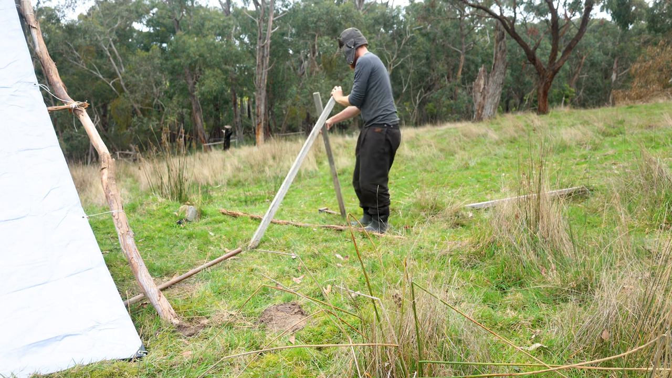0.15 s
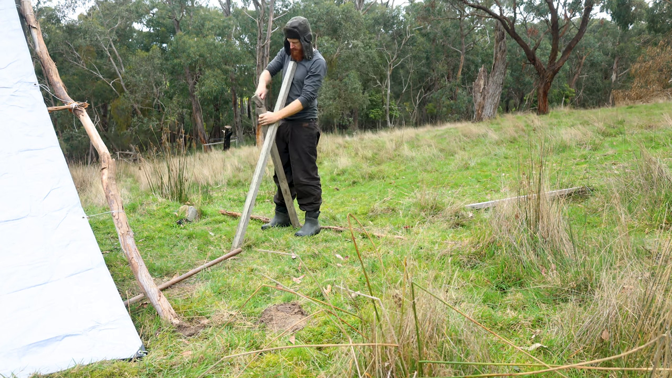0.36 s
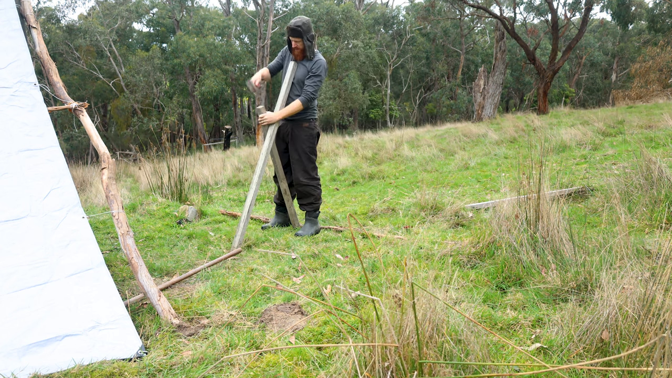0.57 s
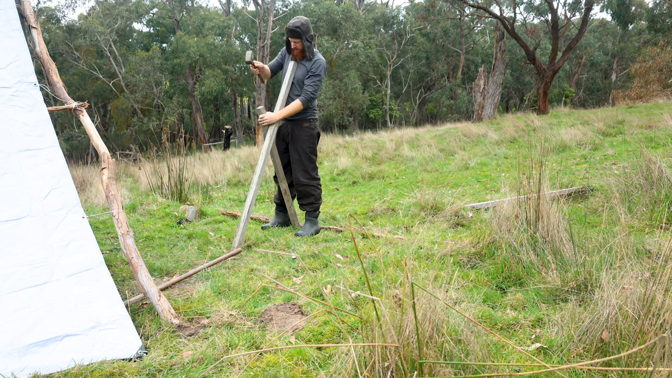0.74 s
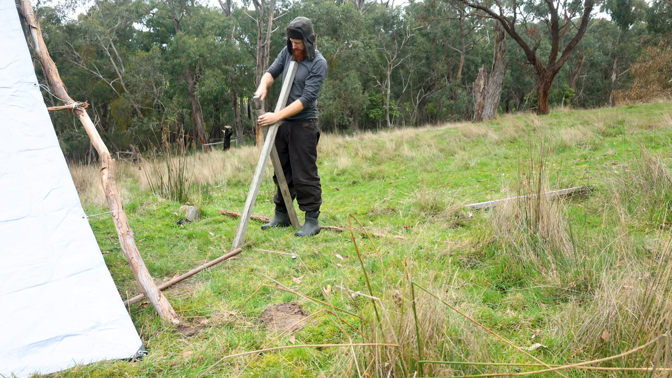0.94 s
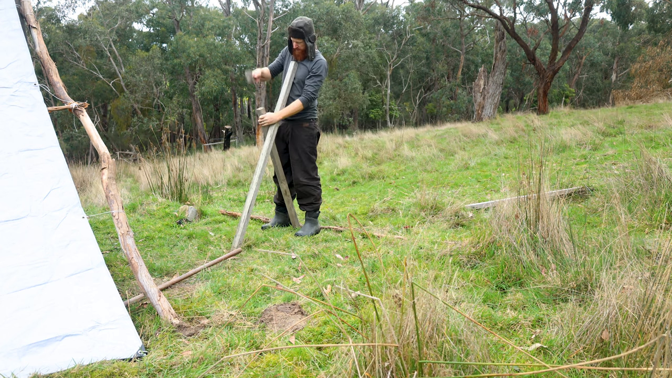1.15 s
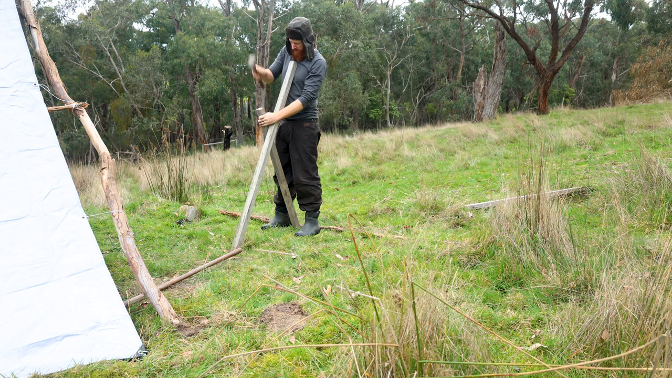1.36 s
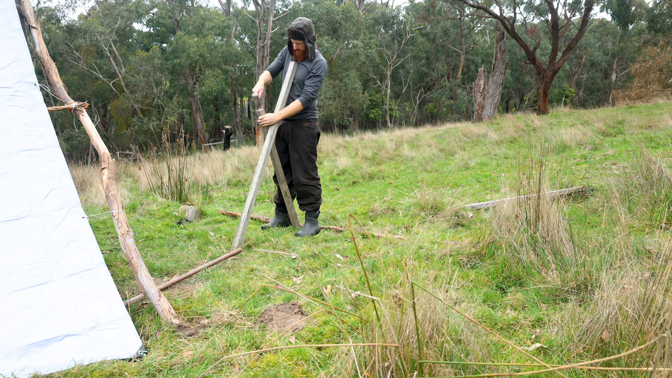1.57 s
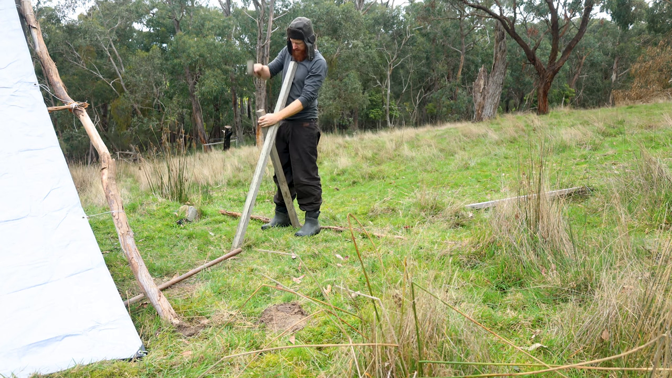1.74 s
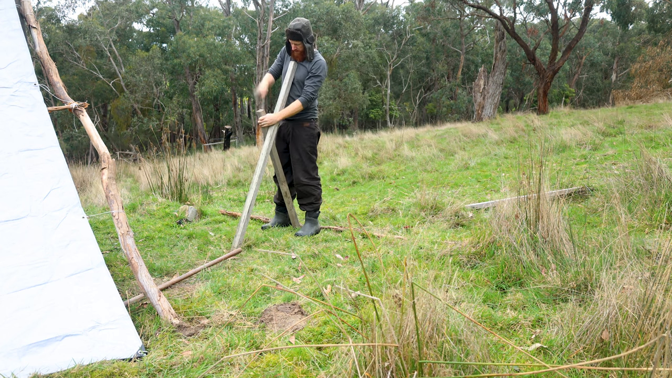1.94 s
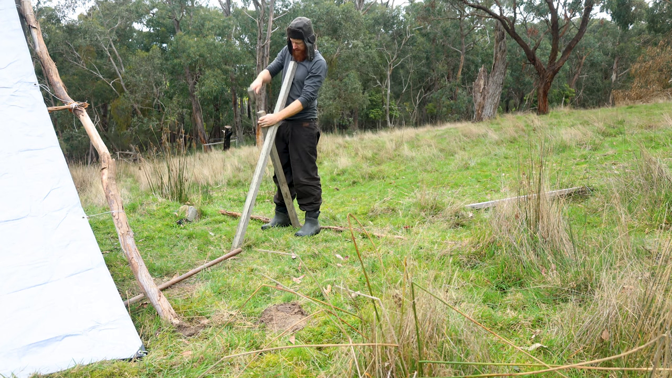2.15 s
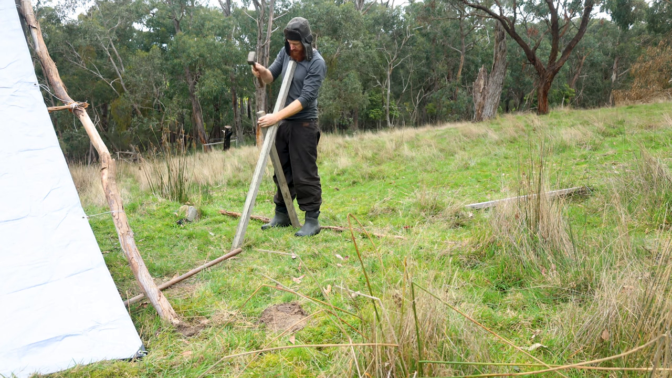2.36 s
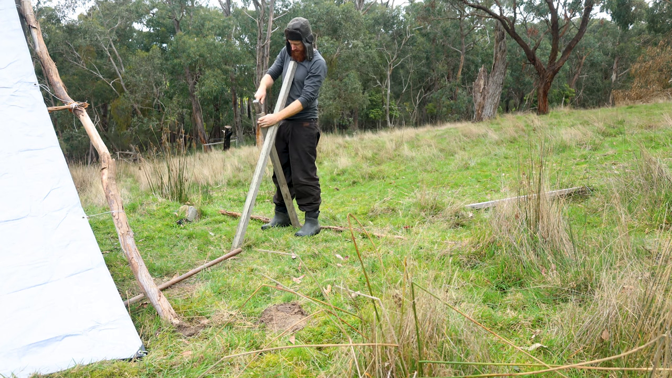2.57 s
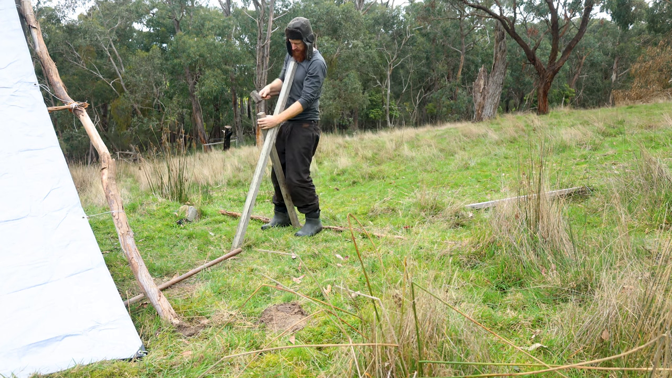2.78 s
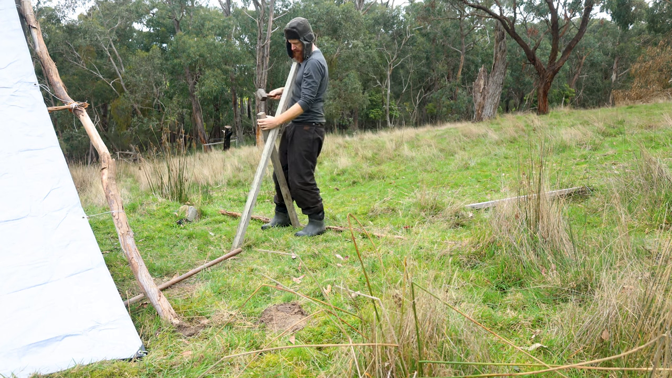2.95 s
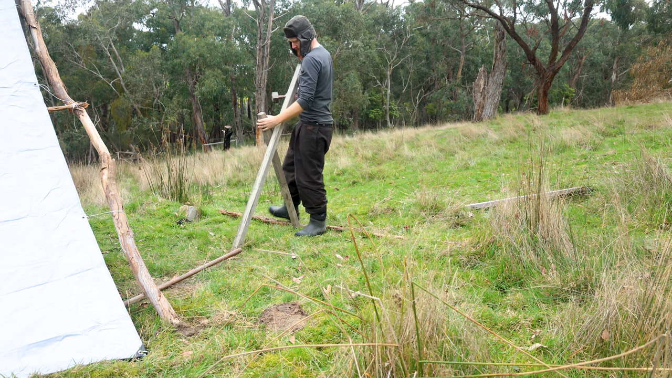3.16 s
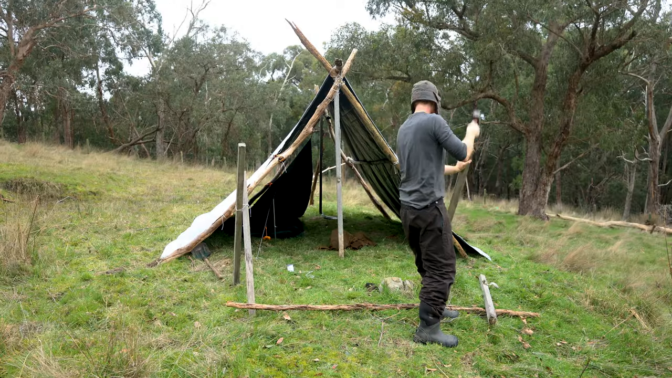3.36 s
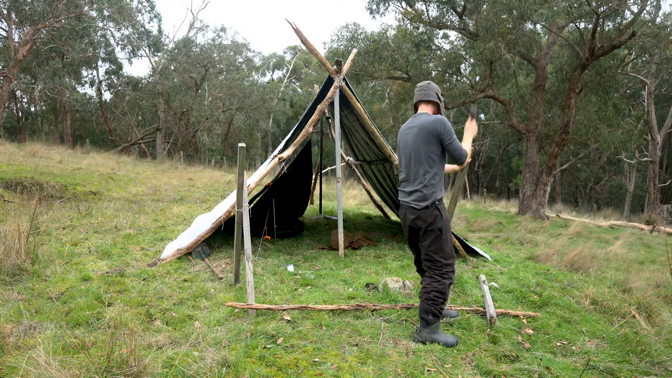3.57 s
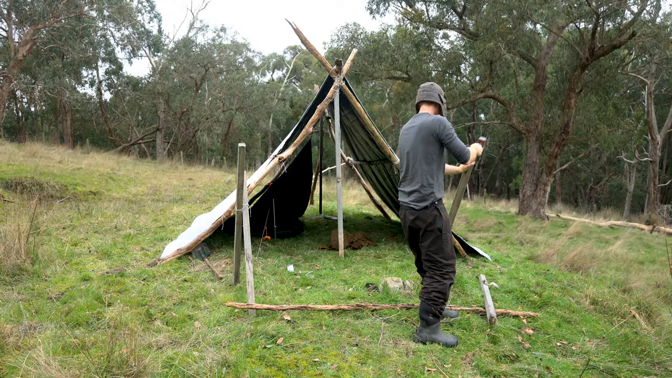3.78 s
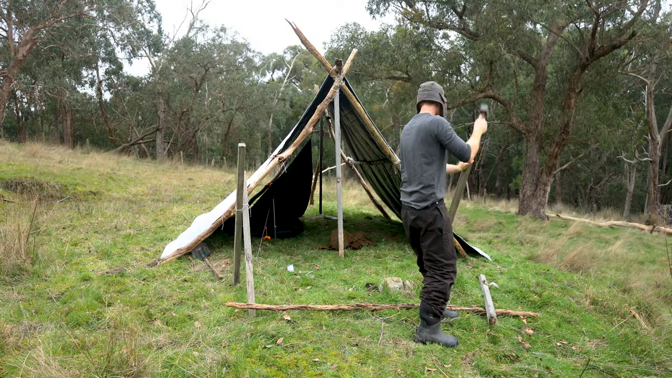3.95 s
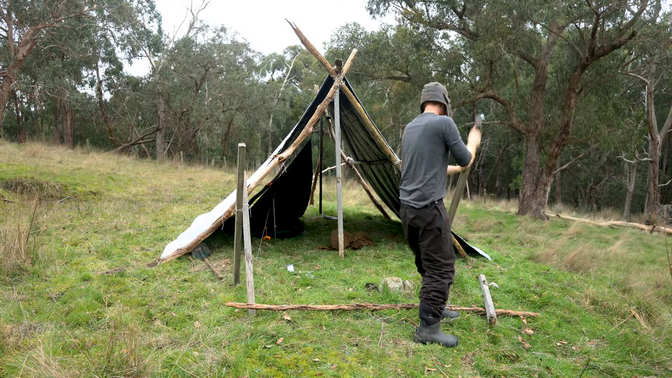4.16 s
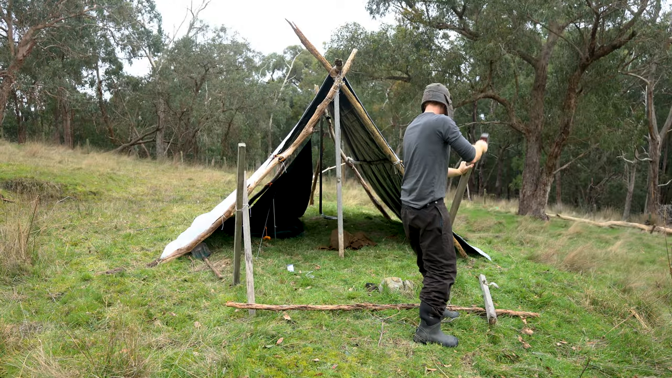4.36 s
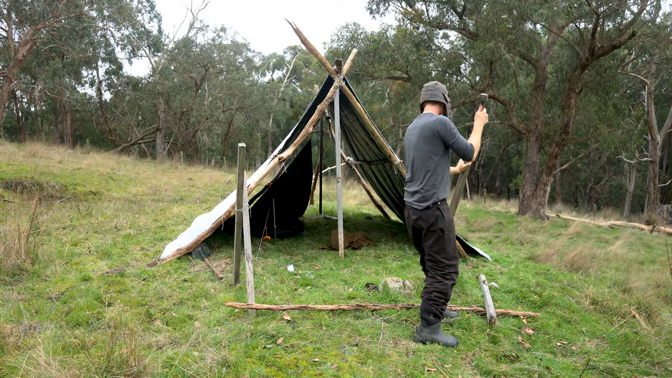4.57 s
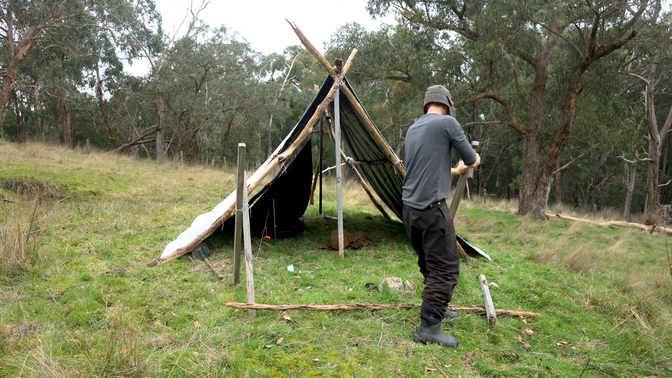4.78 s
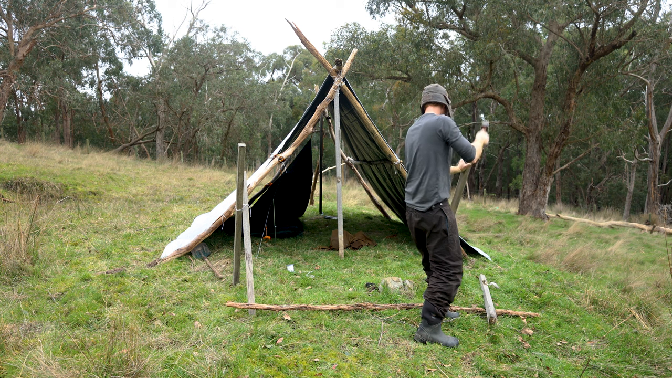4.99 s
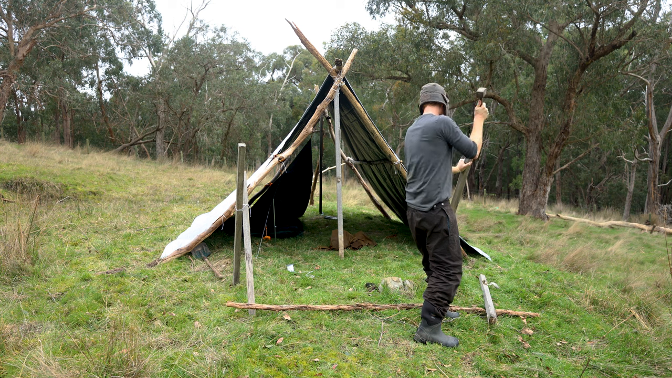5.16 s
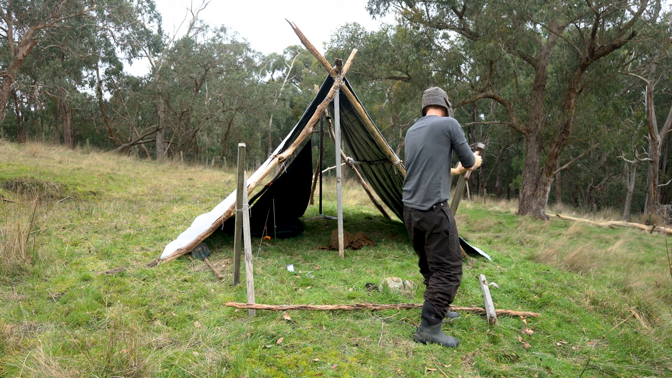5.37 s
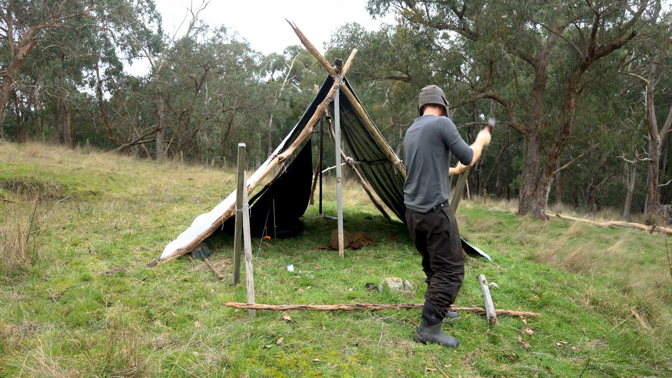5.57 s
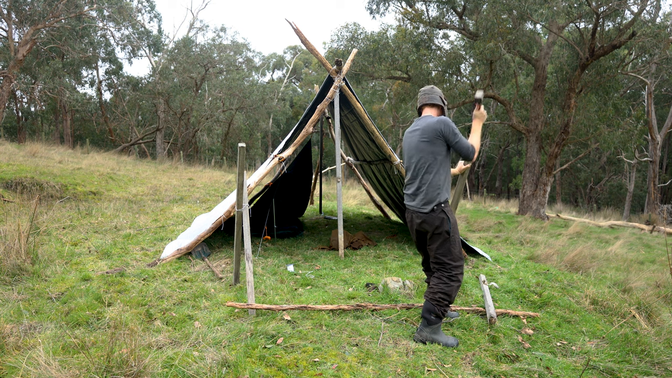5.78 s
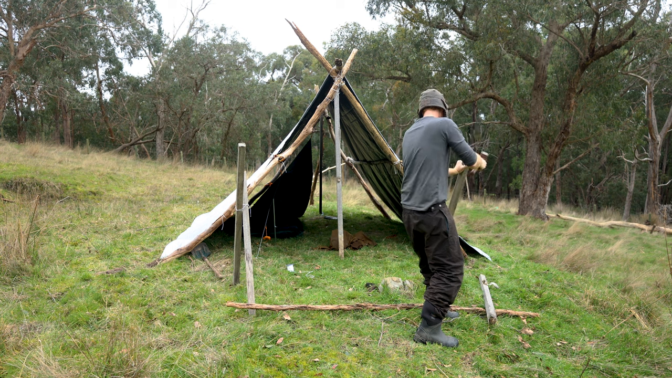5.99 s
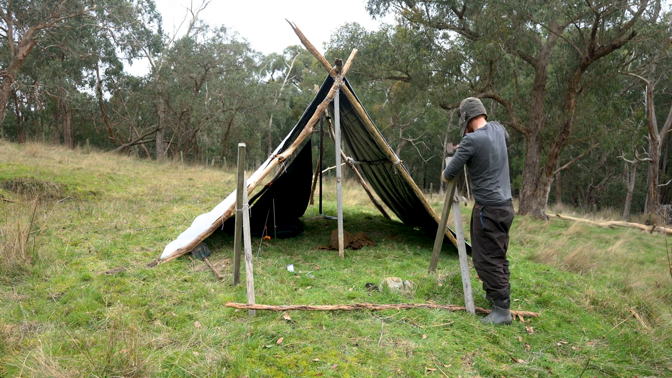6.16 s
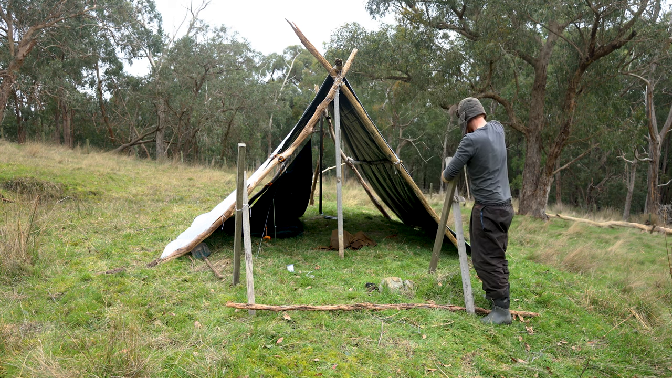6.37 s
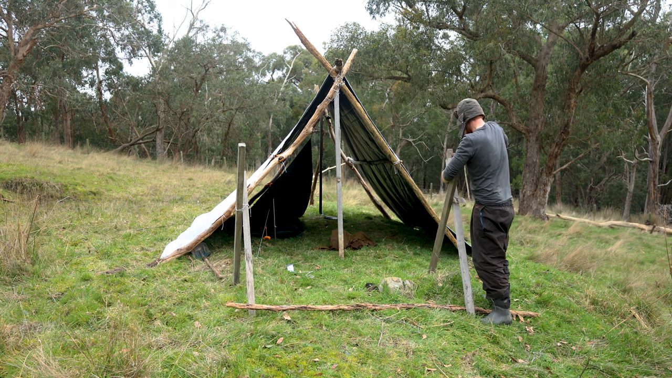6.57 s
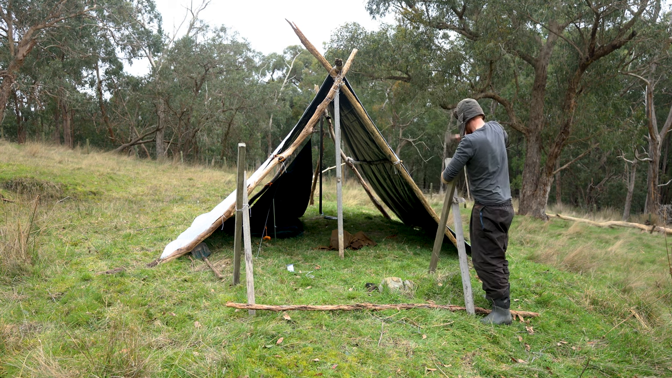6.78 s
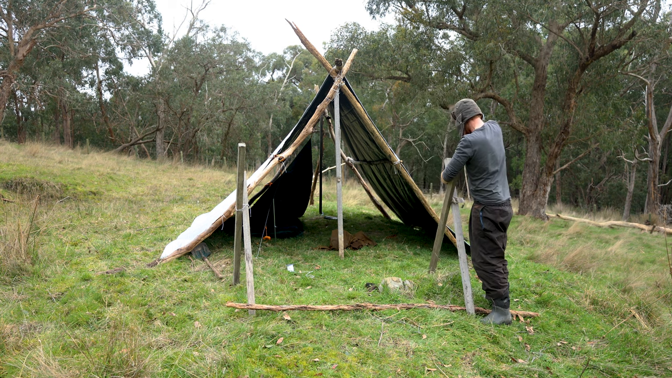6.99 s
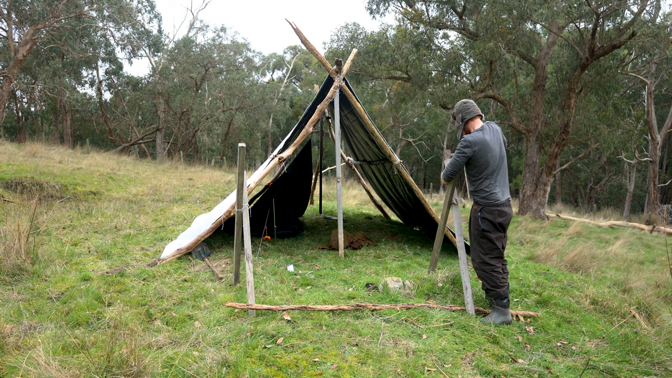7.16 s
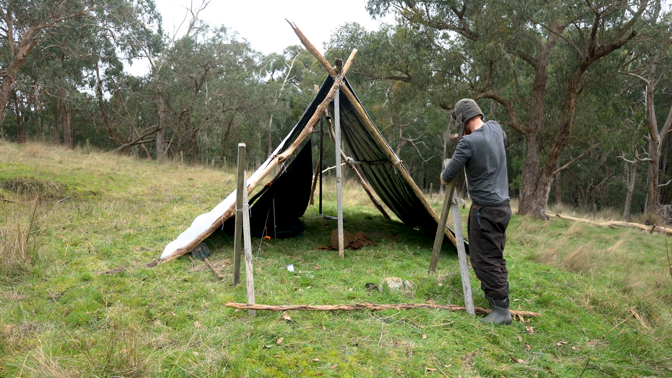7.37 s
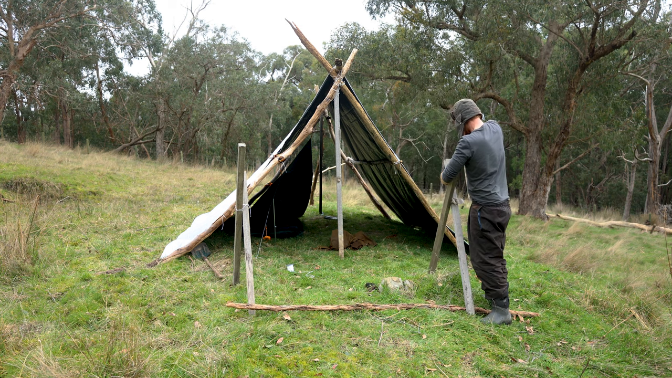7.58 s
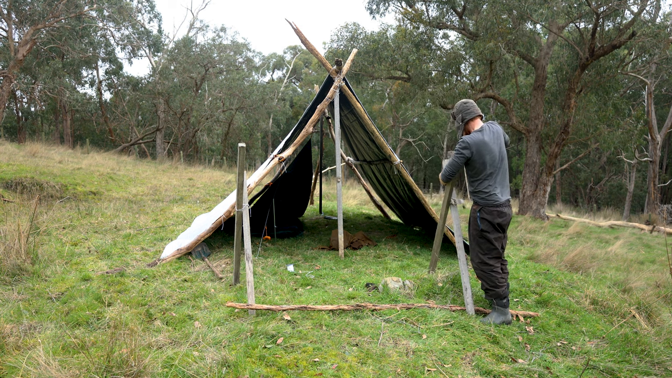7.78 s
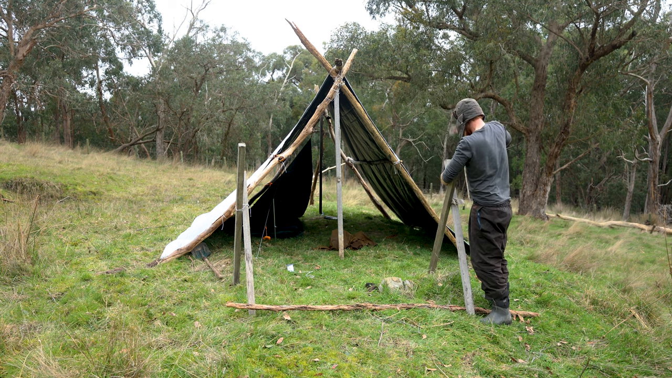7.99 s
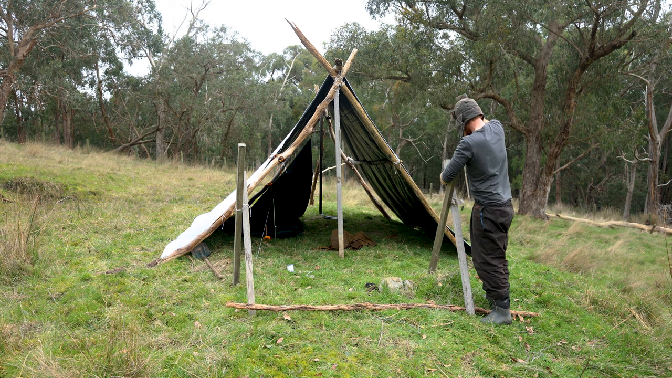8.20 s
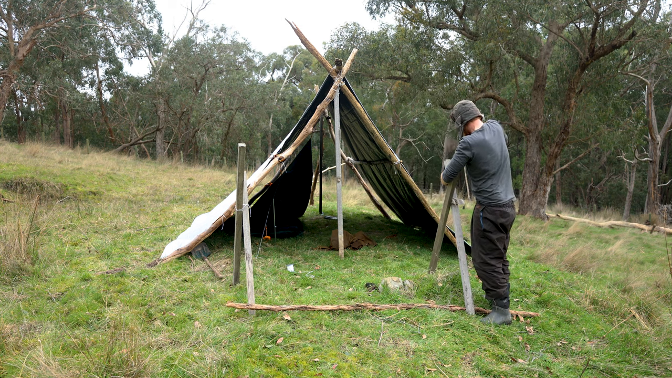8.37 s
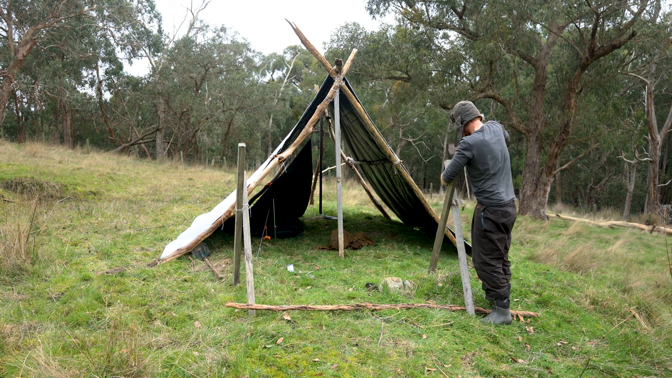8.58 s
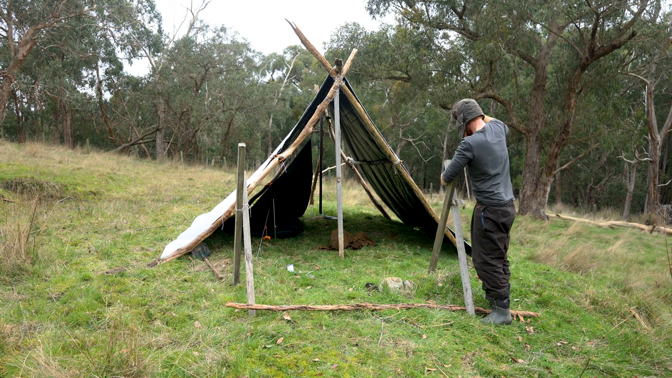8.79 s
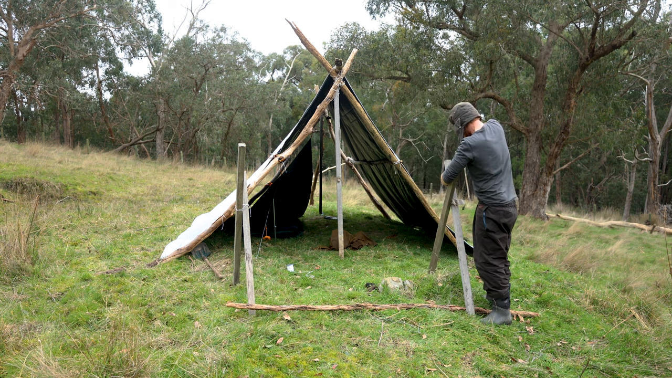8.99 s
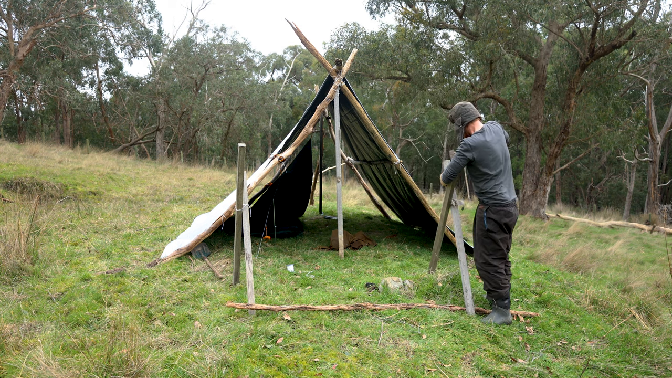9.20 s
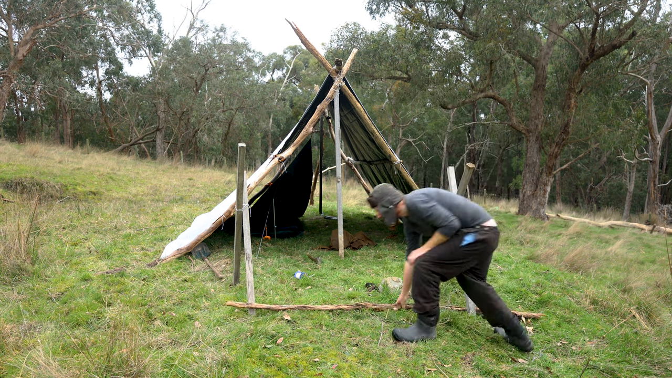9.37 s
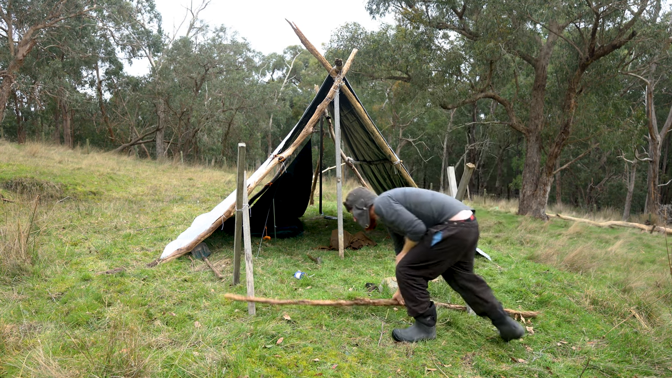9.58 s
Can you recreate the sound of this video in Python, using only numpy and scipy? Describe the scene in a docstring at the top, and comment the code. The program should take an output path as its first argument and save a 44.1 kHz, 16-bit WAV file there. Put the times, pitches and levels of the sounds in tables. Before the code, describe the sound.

Outdoor hammering on three stakes in turn, heard by a microphone a few metres off with low wind rumble. Dry, short, hard knocks are followed by distinct slaps and a long diffuse wash from the trees. The timbre jumps abruptly twice as the stake changes. Stalks rustle at the start and just before the first change; two thin bird chirps come early, with faint peeps and a low engine later. After the last blow, dry grass crackles underfoot.

```python
"""Three wooden stakes are hammered into turf in turn, in a clearing ringed by forest, with abrupt jumps between them.
Dry stalks snap and boots brush the grass at the start, before the first jump and after the last.
Each blow cracks, rings in the damped modes of the wood and returns as distinct echoes and a long wash from the trees.
A near bird calls twice early on; around the first jump a far engine and stronger wind come in, then a far bird peeps.
Treetops hush throughout as filtered noise; gain control ducks on loud knocks and creeps back, and peaks are flattened."""
import sys
import numpy as np
from scipy import signal
from scipy.fft import rfft, irfft, next_fast_len
from scipy.io import wavfile
from scipy.ndimage import uniform_filter1d

SR = 44100
rng = np.random.default_rng(int(sys.argv[2]) if len(sys.argv) > 2 else 0)


def store_wav(level_fs):
    """Save 16-bit WAV to argv[1]."""
    pcm = np.round(np.clip(np.atleast_2d(level_fs), -1, 1) * 32767)
    wavfile.write(sys.argv[1], SR, pcm.T.astype(np.int16))


N = 425124
TIME = np.arange(N) / SR
CUTOFF_HZ = 16300  # top of the audible range here

# Jumps between the spells of sound. Each entry: start of a spell in seconds.
JUMPS_S = (0, 3.385, 6.19, 9.314)


def from_db(db):
    """Decibels to gain."""
    return 10 ** (np.asarray(db) / 20)


def unit(x):
    """Scale to an energy of one."""
    return x / np.sqrt(np.sum(x ** 2) + 1e-20)


def in_time(rows):
    """Each column of a curve, in straight lines between its times, at every sample."""
    s, *columns = np.transpose(rows)
    return [np.interp(TIME, s, c) for c in columns]


def at_hz(rows, hz):
    """Each column of a spectrum table at the given frequencies, read on a log frequency axis."""
    points, *columns = np.transpose(rows)
    return [np.interp(np.log(hz + 1e-9), np.log(points), c) for c in columns]


def band(x, low_hz, high_hz, order=2):
    """Causal band-pass."""
    sos = signal.butter(order, [low_hz, min(high_hz, .45 * SR)], "band", fs=SR, output="sos")
    return signal.sosfilt(sos, x + 1e-18)


def add(out, s, x):
    """Mix a short sound in at time s."""
    i = max(round(s * SR), 0)
    out[i:i + len(x)] += x[:max(N - i, 0)]


def drift(points_per_s, size):
    """Random points joined by straight lines, with a spread near one."""
    steps = np.arange(size) / SR * points_per_s
    return np.interp(steps, np.arange(8192), rng.standard_normal(8192))


def noise(colour):
    """Steady noise of the given spectrum, rms one."""
    gain = from_db(at_hz(colour, np.fft.rfftfreq(N, 1 / SR))[0])
    gain[0] = 0
    return unit(irfft(rfft(rng.standard_normal(N)) * gain, N)) * np.sqrt(N)


def dying_noise(table, t):
    """Overlapping bands of noise, each with its own energy and decay."""
    hz, out = np.fft.rfftfreq(len(t), 1 / SR), 0
    white = rfft(rng.standard_normal(len(t)))
    centres = np.array(table)[:, 0]
    for k, (_, db, t60) in enumerate(table):
        only_this = np.eye(len(table))[k]
        share = at_hz(np.c_[centres, only_this], hz)[0] * (hz > 40) * (hz < CUTOFF_HZ)
        dying = irfft(white * share, len(t)) * from_db(-60 * t / t60)
        # the norm of the share makes the table's level a density per Hz
        out = out + unit(dying) * from_db(db) * np.linalg.norm(share)
    return unit(out)


# Scattering by the forest. Each row: frequency in Hz, relative density in dB per Hz, decay by 60 dB in seconds.
FOREST = [(108, -51, 1.0), (394, -7, 3.8), (930, 7, 2.24), (1850, -1, 3.42), (2650, 1, 2.2),
          (4100, -2.5, 1.59), (7560, 3.5, 1.0), (10170, -1.5, 0.54), (15000, 5, 0.3)]


def forest(x, wet_db, lumpy_db=3.0, build_s=0.024):
    """Thousands of trunks scatter sound into a long lumpy wash, made by convolving with dying noise."""
    t = np.arange(int(1.5 * SR)) / SR
    lumps = from_db(lumpy_db * drift(153.3, len(t)))
    wash = dying_noise(FOREST, t) * (1 - np.exp(-t / build_s)) * lumps
    return signal.fftconvolve(x, from_db(wet_db) * unit(wash))[:N]


# Spectrum of the treetops' hush. Each row: frequency in Hz, relative density in dB per Hz.
TREETOP_COLOUR = [(50, 2.5), (110, 3.3), (220, -7), (400, -4.5), (800, -6), (1300, -11), (2200, -24),
                  (4000, -26.5), (7000, -27.5), (10000, -31), (15500, -32)]
# How loud the treetops are. Each row: time in seconds, rms level in dB.
TREETOP_LEVEL = [(0, -43), (.45, -48.5), (3.3, -49), (3.45, -51), (9.64, -51.5)]


def treetops():
    """The hush of the treetops is steady coloured noise that follows a level curve."""
    return from_db(in_time(TREETOP_LEVEL)[0]) * noise(TREETOP_COLOUR)


# Spectrum of wind on the microphone. Each row: frequency in Hz, relative density in dB per Hz.
WIND_COLOUR = [(15, -4.5), (33, 3), (48, -1.5), (70, -14.5), (110, -18.5), (180, -39), (400, -80)]
# How hard the wind blows. Each row: time in seconds, level in dB about which gusts play.
WIND_LEVEL = [(0, -76), (3.3, -66), (3.4, -52), (4.8, -56), (5.1, -47.5), (7.7, -39.5), (9.29, -40),
              (9.36, -51)]


def wind(gust_db=2.0, gusts_per_s=6.0):
    """Wind on the microphone is a low rumble of noise whose level wanders in gusts."""
    level_db = in_time(WIND_LEVEL)[0] + gust_db * drift(gusts_per_s, N)
    return from_db(level_db) * noise(WIND_COLOUR)


# A far engine that bogs down and picks up again. Each row: time in seconds, firing rate in Hz, overall gain in dB.
ENGINE = [(3.35, 35, -69), (3.42, 35, -58), (6.18, 34.2, -58), (6.2, 30.5, -48.5), (8.35, 29.4, -48),
          (8.55, 27, -46), (8.8, 25, -53), (9.1, 31, -43), (9.3, 31.5, -46), (9.33, 31.5, -68)]
# Its overtones. Each row: multiple of the firing rate, relative level in dB.
ENGINE_ORDERS = [(3, -10), (4, -1), (5, -8), (6, -20)]


def engine(waver_db=1.6):
    """Only the low orders of a distant engine carry: sines on multiples of its firing rate, each wavering."""
    hz, db = in_time(ENGINE)
    turn = 2 * np.pi * np.cumsum(hz) / SR
    hum = 0
    for k, level in ENGINE_ORDERS:
        hum = hum + from_db(level + waver_db * drift(3.1, N)) * np.sin(round(k) * turn)
    return from_db(db) * hum


def whistle(hz, waver=.02):
    """A thin tone that wavers about the given pitch."""
    return np.sin(2 * np.pi * np.cumsum(hz * (1 + waver * drift(700, len(hz)))) / SR)


# A near bird's call: it rises, leaps in the middle and hooks over at the top.
# Each row: time into the call in seconds, pitch in Hz, relative level in dB.
CALL = [(0, 5300, -20), (.024, 6000, -11), (.033, 6600, -2), (.044, 6850, -2), (.054, 8200, 0),
        (.066, 8050, -1), (.08, 7500, -9)]
# When the near bird calls. Each row: start in seconds, level in dB.
CALLS_HEARD = [(0.389, -43), (1.903, -43.5)]
# A far bird's short peeps. Each row: start in seconds, glide in Hz per second, level in dB.
PEEPS = [(4.14, 14000, -58), (4.305, 35000, -55), (5.005, 4000, -55), (6.87, 12000, -57),
         (7.64, 16000, -58), (8.289, -35000, -55)]
PEEP_HZ, PEEP_SPREAD_HZ, PEEP_S = 8100, 500, .042
# fainter peeps come at random
FAINT_PEEPS_PER_S, FAINT_PEEP_DB, GLIDE_SPREAD_HZ_PER_S = 1.6, -61, 18000


def birds(wet_db=-9, count=40):
    """Birds whistle gliding tones into the forest: a near one calls twice, a far one peeps after the first jump."""
    out = np.zeros(N)
    knots, hz, db = np.transpose(CALL)
    t = TIME[:int(knots[-1] * SR)]
    shape = from_db(np.interp(t, knots, db)) * signal.windows.tukey(len(t), .2)
    for s, call_db in CALLS_HEARD:
        add(out, s, from_db(call_db) * shape * whistle(np.interp(t, knots, hz)))
    times = JUMPS_S[1] + np.cumsum(rng.uniform(.5, 1.5, count)) / FAINT_PEEPS_PER_S
    faint = [(s, rng.normal(0, GLIDE_SPREAD_HZ_PER_S), FAINT_PEEP_DB) for s in times]
    t = TIME[:int(PEEP_S * SR)]
    for s, glide, peep_db in list(PEEPS) + faint:
        pitch = rng.normal(PEEP_HZ, PEEP_SPREAD_HZ) + glide * (t - PEEP_S / 2)
        add(out, s, from_db(peep_db) * np.hanning(len(t)) * whistle(pitch))
    return out + forest(out, wet_db)


# Spectrum of cloth on grass. Each row: frequency in Hz, relative density in dB per Hz.
BRUSH_COLOUR = [(150, -3.5), (350, -5.5), (1200, -10), (2500, -5), (5500, -9), (10000, -17.5), (16000, -18)]
# Boots and trousers brushing the grass. Each row: start in seconds, length in seconds, level at the peak in dB.
STRIDES = [(0.069, 0.022, -37), (2.88, 0.48, -59), (9.3, 0.15, -53), (9.445, 0.21, -42.5)]
STRIDE_RISE = .17  # share of a stride spent swelling
STRIDE_FADE_DB = 14  # rate of the sinking after it, in dB per whole stride length


def grass(rough_db=2.2):
    """Each stride is rough noise that swells quickly and sinks as the blades slide off the cloth."""
    sweep = np.zeros(N)
    for s, length, db in STRIDES:
        part = np.linspace(0, 1, int(length * SR))
        rise = np.minimum(part / STRIDE_RISE, 1)
        fade = from_db(-STRIDE_FADE_DB * np.maximum(part - STRIDE_RISE, 0))
        add(sweep, s, from_db(db) * rise * fade)
    return sweep * from_db(rough_db * drift(250, N)) * noise(BRUSH_COLOUR)


def taps(events, low_hz, high_hz, t60, level_db):
    """Small contacts: short puffs of noise in one band."""
    out, t = np.zeros(N), TIME[:SR // 10]
    for s, db in events:
        puff = band(rng.standard_normal(len(t)) * from_db(-60 * t / t60), low_hz, high_hz)
        add(out, s, from_db(db + level_db) * puff / np.max(np.abs(puff)))
    return out


# Dull bumps of rebounding hammer and boots. Each row: start in seconds, relative peak in dB.
BUMPS = [(0.044, -43), (1.085, -37), (1.629, -32), (2.157, -33.5), (6.743, -38), (7.295, -36), (7.318, -43),
         (7.881, -35), (9.411, -32), (9.424, -38)]


def bumps():
    """Rebounding hammer and boots make low, soft puffs."""
    return taps(BUMPS, 190, 650, t60=0.038, level_db=6.5)


# Dry stalks snapping. Each row: start in seconds, relative peak in dB.
STALKS = [(0.0368, -35), (0.0796, -39), (2.7546, -48), (2.9674, -32), (3.253, -23.5), (9.3521, -34),
          (9.3793, -26), (9.3947, -16), (9.4232, -20), (9.4284, -26)]


def stalks():
    """Snapping dry stalks make bright, very short puffs."""
    return taps(STALKS, 1500, 10500, t60=0.013, level_db=-9.5)


# Registers in which a blow is voiced. Each row: low edge in Hz, high edge in Hz.
BLOW_BANDS_HZ = [(100, 350), (350, 750), (750, 1300), (1300, 2200), (2200, 3200), (3200, 5000),
                 (5000, 9000), (9000, 16000)]


def voiced(x, band_db):
    """Bring each register to its level with a smooth causal tone curve, in two passes."""
    size = next_fast_len(2 * len(x), real=True) // 2 * 2
    hz, spectrum = np.fft.rfftfreq(size, 1 / SR), rfft(x, size)
    centres = np.sqrt(np.prod(BLOW_BANDS_HZ, axis=1))
    for _ in range(2):
        power = np.abs(spectrum) ** 2
        energy = [2 / size * np.sum(power[(hz >= low) & (hz < high)]) for low, high in BLOW_BANDS_HZ]
        log_gain = at_hz(np.c_[centres, np.log(from_db(band_db) / np.sqrt(energy))], hz)[0]
        cepstrum = irfft(log_gain)[:size // 2]
        cepstrum[1:] *= 2  # minimum phase: nothing sounds before the blow
        spectrum = spectrum * np.exp(rfft(cepstrum, size))
    return irfft(spectrum)[:len(x)]


# Crowd of heavily damped modes in wood and soil.
# Each row: frequency in Hz, relative density in dB per Hz, decay by 60 dB in seconds.
GRAIN = [(90, -11.5, 0.11), (306, -2, 0.052), (550, -1, 0.054), (970, -0.5, .05), (1700, -3.5, 0.037),
         (3100, -5, 0.041), (4900, -11.5, .032), (8500, -19, 0.047), (12000, -23.5, 0.013),
         (15500, -27, .025)]


def blow(t, band_db, main_hz, modes, grain_db, main_db, swell_s, main_width_hz, crack_db=-5, crack_s=0.0007):
    """One knock: the stake's modes, a main ring, the damped grain and the crack of contact."""
    hz, width, db = np.transpose(modes)[:, :, None]
    # wider modes die faster, so they start stronger to reach the same peak in the spectrum
    strength = from_db(db + rng.normal(0, 2.0, hz.shape)) * width * rng.choice([-1, 1], hz.shape)
    wood = unit(np.sum(strength * np.exp(-np.pi * width * t) * np.sin(2 * np.pi * hz * t), axis=0))
    main = unit(np.exp(-np.pi * main_width_hz * t) * np.cos(2 * np.pi * main_hz * t))
    # bending waves need a moment to fill the stake; the crack comes at once
    ring = unit((wood + from_db(main_db) * main) * (1 - np.exp(-t / swell_s)))
    snap = rng.standard_normal(len(t)) * np.exp(-t / crack_s)
    crack = unit(band(snap, 1330, 3670, order=1))
    grain = dying_noise(GRAIN, t)
    return voiced(ring + from_db(grain_db) * grain + from_db(crack_db) * crack, band_db)


def slaps(x, echoes):
    """Lone trunks throw back soft knocks, groups of trees smeared ones."""
    t = TIME[:SR // 2]
    paths = np.zeros(len(t))
    for delay, spread, hz, db in echoes:
        cluster = rng.standard_normal(len(t)) * np.exp(-.5 * ((t - delay) / spread) ** 2)
        paths += from_db(db) * unit(band(cluster, hz / 1.45, hz * 1.45))
    return signal.fftconvolve(x, paths)[:N]


# Hammer blows, each against its stake's average.
# Each row: stake, time in seconds before a small contact delay, force in dB, hardness of contact in dB,
# ground thud in dB, hollow knock in dB, carry to the trees in dB, strongest ring in Hz.
BLOWS = [("A", 0.485, -.7, 5.2, -2, -2.5, 0, 1970), ("A", 1.028, 1, -6.3, -1, 0, -1.5, 1600),
         ("A", 1.575, 1.5, -4.7, 2.5, 1, .5, 1424), ("A", 2.1025, -1.4, 3, -3, 4, 1.5, 1435),
         ("A", 2.622, 0, 3.4, 4.5, -1, 2.5, 1926), ("B", 3.228, 0, -2, 0, 2, 1, 1180),
         ("B", 3.776, 1.5, 1, -4, 0, .5, 1150), ("B", 4.3305, 0, 4, 0, -1.5, .5, 1470),
         ("B", 4.8985, -1, -6.7, -1, .7, -2, 1242), ("B", 5.4635, 0, -1.5, 4, 3, -.5, 1180),
         ("B", 6.0375, 0, 2, 2.5, -2, -.5, 1657), ("C", 6.143, 1.5, 2, 0, 5, .5, 1750),
         ("C", 6.692, 1.7, 3, -11, 5, 0, 1750), ("C", 7.251, -.8, 7.5, 4.5, 2, 2, 1695),
         ("C", 7.832, .3, -9.7, 2, 0, 1, 1253), ("C", 8.533, -1.5, -4.7, 1.5, -2, -1, 1667),
         ("C", 9.208, .5, 3, 4.5, -5.3, -1.5, 1700)]
# A square, hard contact trades thud for crack. Each entry: dB gained by one register per dB of hardness.
HARDNESS_TILT = (-.25, .2, -.21, .29, .45, .92, .46, .41)
HARDNESS_SING = .8  # dB gained by the lengthwise ring per dB of hardness


def hammering(stake, tone, modes, sing, echoes, heard, level_db, sing_db, wet_db, echo_db, front_s, contact_s,
              carry_db=7, count=3, **timbre):
    """All blows on one stake, direct and thrown back by the trees, audible between the two times in heard."""
    direct, singing, outward = np.zeros(N), np.zeros(N), np.zeros((count, N))
    t = TIME[:SR // 6]
    early = t[:SR // 40]
    long_ring = 0
    for hz, t60, db in sing:
        long_ring = long_ring + from_db(db) * unit(from_db(-60 * t / t60) * np.sin(2 * np.pi * hz * t))
    for s, force_db, hard_db, thud_db, knock_db, out_db, main_hz in [row[1:] for row in BLOWS if row[0] == stake]:
        start = s + contact_s
        band_db = np.array(tone) + force_db + hard_db * np.array(HARDNESS_TILT)
        band_db[:2] += thud_db, knock_db
        add(direct, start, blow(t, band_db, main_hz, modes, **timbre))
        add(singing, start, from_db(sing_db + force_db + HARDNESS_SING * hard_db) * long_ring)
        # the hard first milliseconds carry to the trees, a little different in each direction
        for direction in outward:
            front = blow(early, band_db, main_hz, modes, **timbre) * np.exp(-early / front_s)
            add(direction, start, from_db(out_db) * front)
    echo = from_db(echo_db) * slaps(outward[0], echoes)
    wash = sum(forest(x + from_db(carry_db) * singing, wet_db) for x in outward)
    sound = direct + singing + echo + wash
    return from_db(level_db) * sound * (TIME > heard[0]) * (TIME < heard[1])


# An average blow on each stake. Each entry: relative level of one register in dB.
TONE_A = (-34.9, -27.3, -18.3, -12.4, -17, -18.6, -24.2, -33.6)
TONE_B = (-22.9, -17.7, -10.4, -11.2, -17.6, -20.7, -28.3, -41.3)
TONE_C = (-34.6, -20.5, -15.6, -11.6, -17.9, -20.7, -28.8, -34)
# Modes of each stake. Each row: frequency in Hz, width in Hz, relative height of the resonance in dB.
STAKE_A = [(665, 88, 2.5), (1090, 120, 2.5), (1470, 130, 5), (1700, 130, -1), (3140, 220, 4.5),
           (3580, 110, 0), (3850, 170, 2), (5150, 600, .5), (6680, 190, -10), (7250, 400, -3)]
STAKE_B = [(1160, 44, -2), (1425, 40, -2), (2080, 29, -12), (2815, 50, -2), (4195, 75, 3), (5720, 250, -9)]
STAKE_C = [(612, 116, -4), (910, 40, -1), (1253, 54, -1), (1660, 70, 0), (2340, 60, -9), (2685, 57, -6),
           (3120, 200, -7), (4560, 150, -12), (5080, 250, -10)]
# Lengthwise modes of each stake, nearly harmonic, faint and slow to die.
# Each row: frequency in Hz, decay by 60 dB in seconds, relative level in dB.
SING_A = [(1985, .07, -1.5), (3945, .07, -5), (11950, .25, -35)]
SING_B = [(1425, .08, -8), (2835, .07, -9), (4220, .07, -15)]
SING_C = [(1725, .11, -2), (3500, .095, -6), (5235, .09, -17)]
# Distinct echoes from tent and trunks around each stake.
# Each row: delay in seconds, spread in seconds, centre in Hz, relative level in dB.
ECHOES_A = [(.04, .01, 2200, -28), (0.134, 0.0042, 2170, -31), (0.225, 0.01, 1340, -29),
            (0.261, .07, 4730, -24), (.325, 0.015, 1800, -31)]
ECHOES_B = [(.0320, 0.0004, 1900, -11.5), (.037, .005, 1000, -20), (.037, .009, 4500, -17),
            (.0575, .0014, 2200, -24), (.100, 0.013, 4400, -19), (.111, 0.0032, 1440, -23),
            (.1615, 0.0015, 2000, -25), (.1965, 0.002, 1900, -27.5), (.243, .006, 1430, -34),
            (.307, .012, 1380, -28.5)]
ECHOES_C = [(0.032, 0.0022, 1850, -20), (.04, .01, 6000, -18), (0.11, 0.009, 1830, -25.5),
            (.2, 0.007, 1050, -24)]


def stakes():
    """Three stakes in turn; the second and third spells open on the tail of a blow that fell just before."""
    first, second, third = zip(JUMPS_S, JUMPS_S[1:])
    a = hammering("A", TONE_A, STAKE_A, SING_A, ECHOES_A, first,
                  level_db=32.5, sing_db=-31, carry_db=9.5, wet_db=-31.5, echo_db=-12,
                  front_s=0.003, contact_s=0.00122,
                  grain_db=-5, main_db=-9, swell_s=0.0024, main_width_hz=93)
    b = hammering("B", TONE_B, STAKE_B, SING_B, ECHOES_B, second,
                  level_db=28, sing_db=-24, carry_db=4.5, wet_db=-26, echo_db=-9.5,
                  front_s=0.0022, contact_s=.0036,
                  grain_db=3.5, main_db=-6, swell_s=0.0014, main_width_hz=47)
    c = hammering("C", TONE_C, STAKE_C, SING_C, ECHOES_C, third,
                  level_db=30.5, sing_db=-27, carry_db=4.5, wet_db=-29, echo_db=-12.5,
                  front_s=0.0028, contact_s=0.000974,
                  grain_db=-1.5, main_db=-6.5, swell_s=0.00032, main_width_hz=54)
    return a + b + c


def scene():
    """The hammering over the sounds of the clearing."""
    background = treetops() + wind() + engine() + birds()
    small = grass() + bumps() + stalks()
    return (background + small + stakes())[None]


def record(dry, threshold_db=-16, squeeze=.36, release_db_per_s=17):
    """Gain control ducks on each loud knock and creeps back; peaks are flattened and the top is cut."""
    level_db = 10 * np.log10(np.maximum(uniform_filter1d(dry[0] ** 2, size=128), 1e-12))
    duck_db = squeeze * np.maximum(level_db - threshold_db, 0)
    # hold the deepest duck so far, let go at a steady rate
    recovery_db = release_db_per_s * TIME
    duck_db = np.maximum.accumulate(duck_db + recovery_db) - recovery_db
    x = dry * from_db(-duck_db)
    x = x / (1 + (x / .9) ** 4) ** (1 / 4)  # soft overload towards a ceiling of 0.9
    return signal.sosfilt(signal.ellip(10, .1, 80, CUTOFF_HZ, fs=SR, output="sos"), x)


dry = scene()
out = record(dry)
store_wav(out)
```